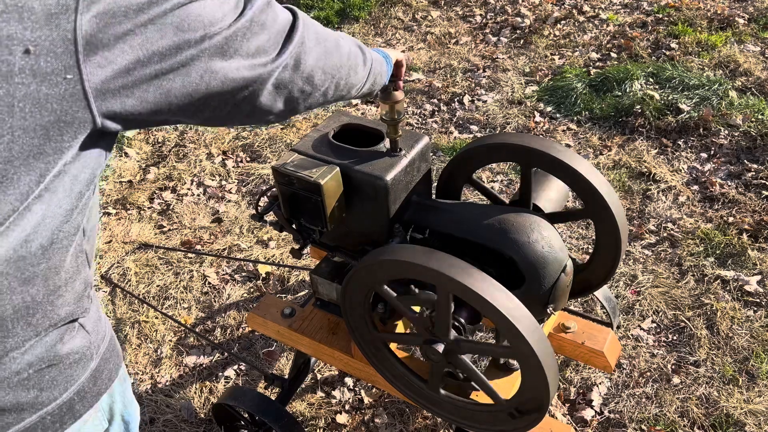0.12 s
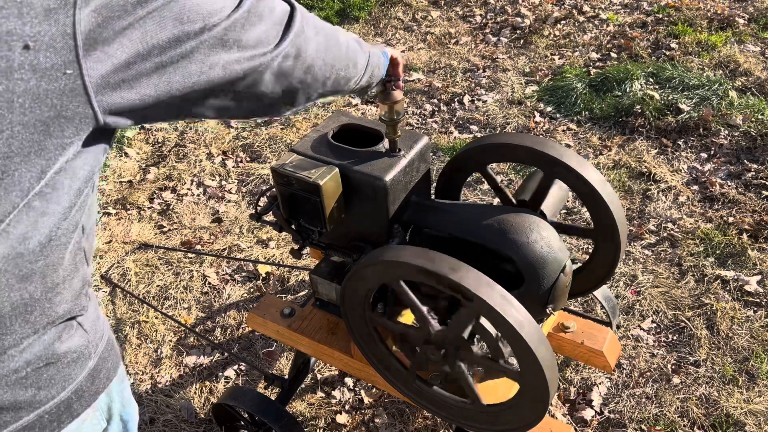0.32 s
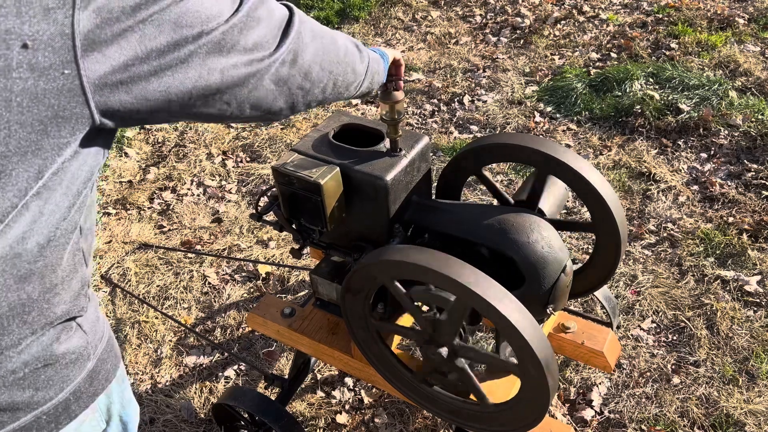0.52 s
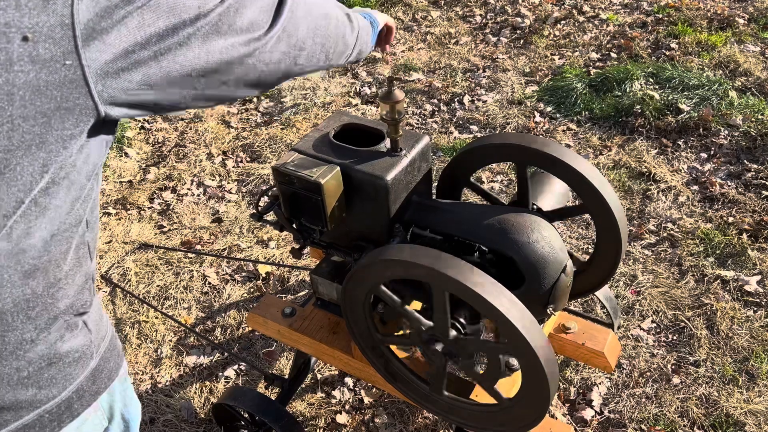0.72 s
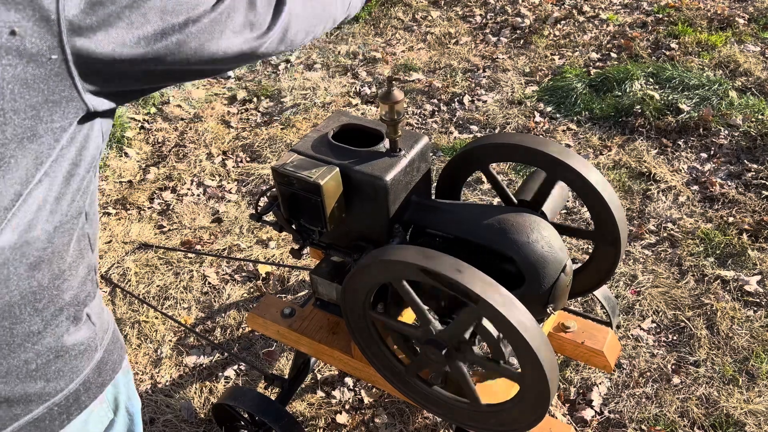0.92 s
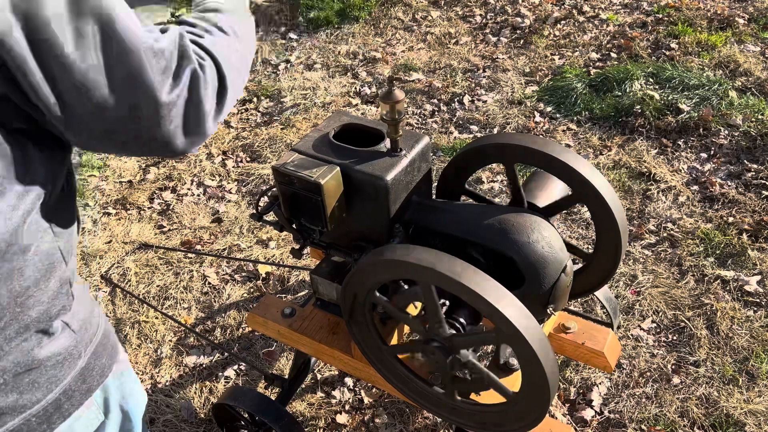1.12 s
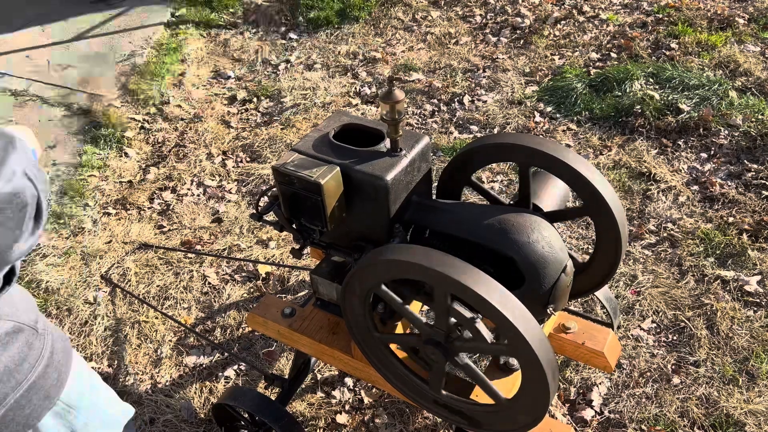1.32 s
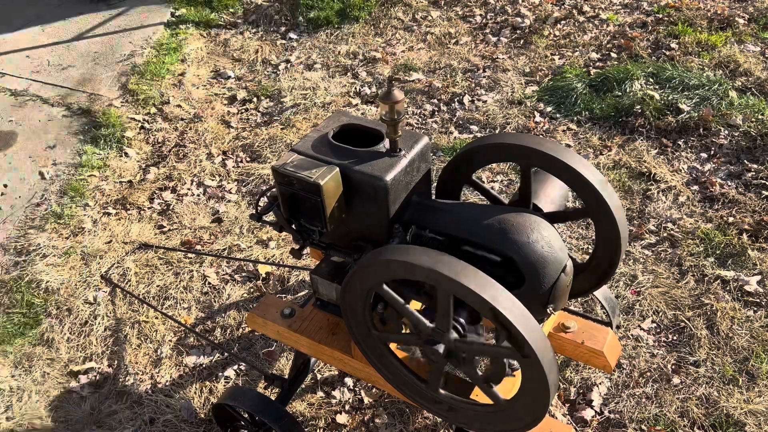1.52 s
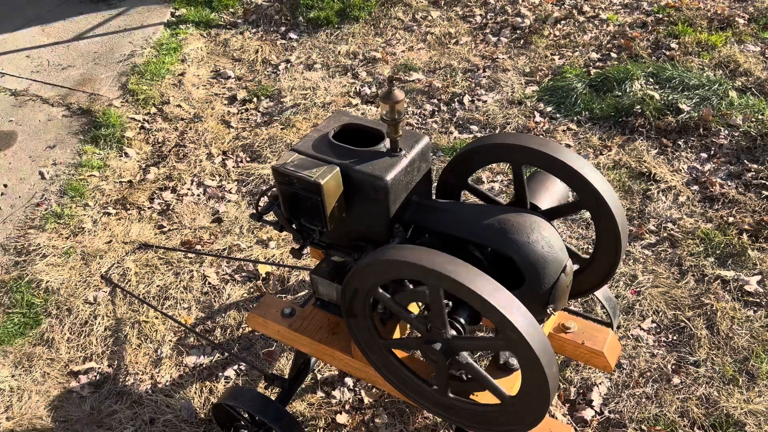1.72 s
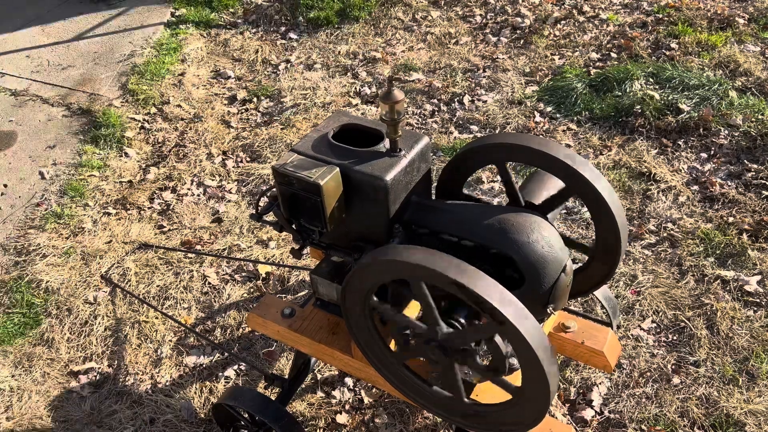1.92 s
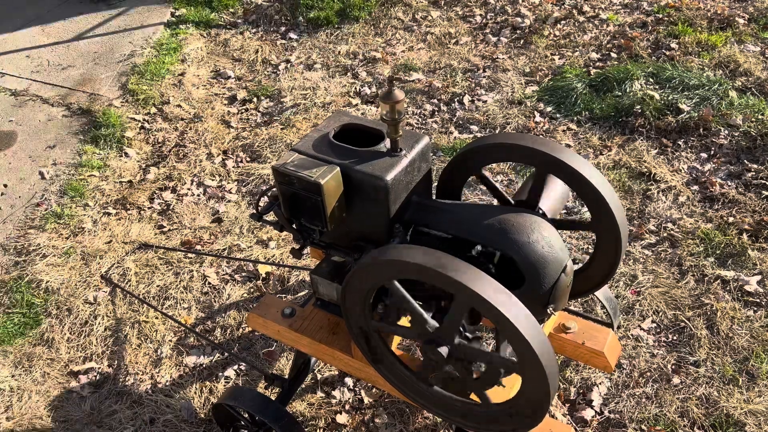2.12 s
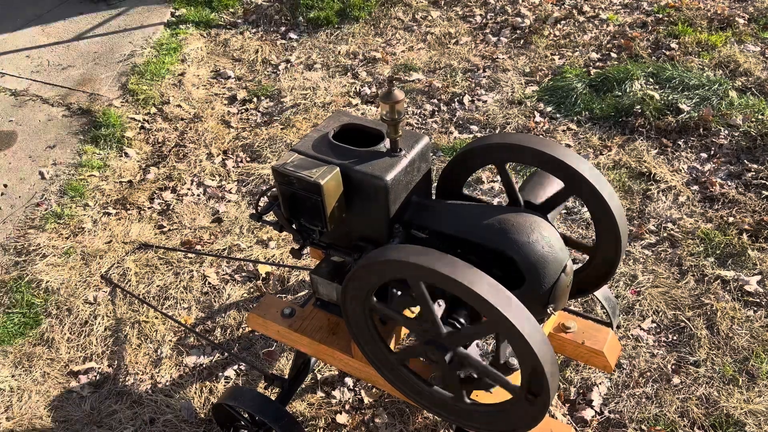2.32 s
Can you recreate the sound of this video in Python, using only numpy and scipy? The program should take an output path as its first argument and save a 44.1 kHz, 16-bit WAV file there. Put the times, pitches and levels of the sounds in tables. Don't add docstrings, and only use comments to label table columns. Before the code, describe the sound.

A small old single-cylinder engine close to the microphone in an open yard gives a brief rising huff, one loud sharp exhaust shot, then steady metallic ticks, clinks and breathy chuffs that slow and sink.

```python
import sys
import numpy as np
from scipy import signal
from scipy.fft import rfft, irfft
from scipy.io import wavfile
from scipy.ndimage import uniform_filter1d

SR = 44100
rng = np.random.default_rng(int(sys.argv[2]) if len(sys.argv) > 2 else 0)


def dump(signal):
    limited = np.clip(np.atleast_2d(signal).T, -1, 1)
    pcm = np.round(limited * 32767).astype(np.int16)
    wavfile.write(sys.argv[1], SR, pcm)


def volts_from_db(level):
    exponent = np.asarray(level, float) / 20
    return 10 ** exponent


N = 105840
LONG = 8192

# [start t/s, level/dB, hold/s, t60/s, brightness 0-1]
GAS_JETS = [(0.084, -50.5, .015, .1, 0.4), (.095, -40.5, 0.0094, .1, 0.85), (0.11, -37, 0.0044, .1, .7),
            (0.117, -22.5, 0.0047, .04, 0.96), (0.131, -30, 0.02, .06, 0.89), (0.169, -36, .004, .05, .9),
            (.179, -32.5, .025, .06, 0.92), (0.209, -21, 0.0055, 0.064, 0.94),
            (0.223, -12, 0.011, 0.026, 0.93), (0.235, -32.5, 0.0075, 0.11, 0),
            (0.266, -11, 0.014, .04, 0.98), (0.2682, -6.5, .01, .05, 1), (0.29, -29.5, 0.0088, .1, 0.93),
            (0.297, -36, 0.013, 0.12, 0), (0.315, -42.5, 0.0085, .06, 0.04)]
# [t/s, peak level/dB, f/Hz, t60/s]
PIPE_BLOWS = [(.229, -27.5, 2420, 0.018), (0.234, -18.5, 1827, 0.05), (0.2662, -9, 530, 0.013),
              (0.278, -22.5, 1030, 0.094), (0.2824, -11, 614, 0.054), (0.291, -15, 417, 0.037),
              (.293, -16.5, 516, .04), (0.311, -22, 398, 0.051), (.319, -23, 610, 0.032),
              (.327, -23.5, 326, 0.038), (2.278, -37.5, 1420, 0.041)]
# [t/s, peak level/dB, f/Hz]
MIC_PUSHES = [(.095, -43.5, 45), (0.123, -37, 106.3), (0.141, -43, 60), (0.144, -43.5, 170),
              (0.266, -32, 52.9), (0.281, -28.5, 129), (0.321, -39.5, 45.5), (.63, -55.5, 34),
              (2.14, -56, 30), (2.18, -62, 59.5), (2.35, -63, 35.2)]
# [t/s, f/Hz, level/dB]
HOWL = [
    (0.041, 248, -62),
    (0.064, 288.4, -44),
    (.09, 372, -40),
    (.11, 487, -38),
    (.13, 499, -40),
    (0.149, 432, -44.5),
    (.17, 300, -48),
    (.2, 260, -62.5),
]
# [start t/s, level/dB, pipe note f/Hz]
CHUFFS = [(0.411, -43.5, 302), (0.529, -45.5, 387), (0.645, -38, 334), (0.773, -49, 356), (0.884, -39, 708),
          (1.012, -50.5, 349), (1.123, -38.5, 305), (1.254, -48, 351), (1.372, -39, 358.6),
          (1.498, -41.5, 416), (1.624, -42.5, 405), (1.753, -46.5, 349), (1.879, -44.5, 388.7),
          (2.01, -47, 450), (2.141, -49, 396), (2.277, -51.5, 407)]
PITCH_SAG = 0.134
# [start t/s, level/dB, hold/s, loudest ring f/Hz]
SCUFFS = [(.009, -41, 0.045, 766), (0.496, -45.5, 0.058, 816), (0.734, -40.5, 0.061, 636),
          (0.969, -47, 0.055, 1125), (1.21, -39.5, 0.054, 754), (1.461, -40.5, 0.046, 1210),
          (1.847, -67, 0.056, 5930), (2.09, -64, 0.081, 3010), (1.71, -44, 0.018, 855),
          (1.965, -47.5, 0.053, 1260), (2.229, -46.5, 0.017, 3990)]
# [start t/s, level/dB, f/Hz, hold/s]
SQUEAKS = [(.012, -42, 1598, 0.055), (.012, -46.5, 759, 0.037), (.015, -59, 9700, 0.028),
           (.015, -52, 8680, 0.037), (.015, -50, 4760, 0.026), (.213, -37, 1190, 0.04),
           (0.216, -39, 1640, 0.05), (0.274, -31.5, 2290, 0.02), (.312, -40, 2233, 0.023),
           (0.129, -35.5, 4660, 0.013), (.42, -53, 6480, 0.024), (1.492, -49, 1210, 0.067),
           (.545, -47, 2810, 0.0059), (.535, -45, 878, 0.024), (.775, -45.5, 4850, 0.016),
           (.742, -43.5, 2320, 0.022), (.878, -45, 652, .035), (.995, -43, 1207, .03),
           (.98, -45.5, 840, 0.073), (.972, -48.5, 5600, 0.011), (1.016, -60, 2760, 0.04),
           (1.12, -53, 7350, 0.02), (1.125, -50, 12200, 0.015), (1.22, -50.5, 4780, 0.038),
           (1.22, -66, 9640, 0.026), (1.462, -43, 2795, 0.014), (1.49, -39.5, 4780, .025),
           (1.46, -44, 8740, 0.0095), (1.575, -50.5, 1970, 0.027), (1.575, -50, 8200, 0.013),
           (1.712, -38.5, 8160, 0.0064), (1.715, -49.5, 4870, 0.033), (1.752, -60, 3350, 0.041),
           (1.83, -48, 8200, 0.027), (1.835, -53.5, 5780, 0.023), (1.918, -62, 3310, 0.057),
           (1.968, -43, 5280, 0.0043), (1.975, -55, 8700, 0.014), (2.015, -57.5, 3370, 0.033),
           (2.09, -60, 3160, .035), (2.1, -59, 8220, 0.018), (2.24, -53, 8250, 0.013),
           (2.236, -47.5, 3900, 0.014)]
# [t/s, peak level/dB]
TICKS = [(0.3768, -30), (0.4926, -28.5), (0.607, -31.5), (0.7243, -30), (0.842, -31.5), (0.9618, -29),
         (1.0774, -36), (1.201, -43.5), (1.3237, -40), (1.4482, -30.5), (1.569, -30.5), (1.699, -26),
         (1.8263, -35), (1.9541, -35.5), (2.077, -36), (2.2174, -38.5), (2.3514, -46.5)]
# [t/s, peak level/dB, loudest ring f/Hz]
CLINKS = [(0.4253, -36, 10000), (0.6608, -33.5, 9880), (0.893, -33.5, 6170), (1.1342, -38, 9620),
          (1.3802, -38.5, 4500), (1.63, -39, 8510), (1.8862, -42, 6090), (2.154, -47.5, 6160)]
# [t/s, peak level/dB]
KNOCKS = [(0.544, -37), (0.777, -24.5), (1.016, -45), (1.258, -35), (1.505, -28), (1.7576, -33.5),
          (2.0137, -36), (2.278, -37.5)]
# [f/Hz, level/dB]
LATCH_MODES = [(8270, 9.5), (3900, 2), (9400, 10), (11000, -3), (12400, 10), (5960, 0)]
# [f/Hz, level/dB]
VALVE_MODES = [(9980, 6.5), (5900, -2), (8000, 3.5), (2797, -8.5), (12870, -25), (8560, -26)]
# [f/Hz, level/dB]
ROCKER_MODES = [(4780, -10), (2830, -0.5), (1210, 4.5), (1540, 5), (3350, -34)]
# [f/Hz, level/dB]
FRAME_MODES = [(720, 3), (880, -2), (1040, 0.5), (1210, -2.5), (1600, 1.5), (2300, -5.5), (2775, -7),
               (4835, -1), (8630, -11), (9580, -4)]
# [f/Hz, level/dB]
HUM_MODES = [(310, -11), (650, -11), (1205, -9.5), (1605, -16)]
CASTING_HZ = np.sort(rng.uniform(500, 15500, 60))
# [f/Hz, level per Hz/dB]
DULL = [(180, -42.5), (300, -33), (1840, -1), (4910, -12), (10400, -2.5), (16000, -20.5)]
# [f/Hz, level per Hz/dB]
BRIGHT = [(180, -46.5), (300, -50.5), (7080, -15.5), (13300, -2.5), (16000, -14)]
# [f/Hz, level per Hz/dB]
SCRAPE = [(300, 1), (900, 4.5), (2500, 4), (5500, -2.5), (8000, -16), (16000, -3.5)]
# [f/Hz, level per Hz/dB]
SNAP = [(880, -63), (1500, 5.5), (3090, -8), (4500, 0), (8490, -5), (16000, -7)]
# [f/Hz, level per Hz/dB]
YARD = [(18, -28.5), (40, -27.5), (145, -7), (311, 0), (684, 0.5), (1040, -4.5), (3580, -20), (8300, -13.5),
        (16000, -20.5)]
# [t/s, level/dB]
YARD_LEVEL = [(0, -39.5), (.08, -48.5), (0.129, -45.5), (.3, -39), (.42, -49), (1.602, -50.5), (2.4, -58)]
# [t/s, level/dB]
TREBLE = [(1.5, -6), (2.4, -20.5)]


def evened(x):
    return x / np.sqrt(np.mean(x ** 2) + 1e-20)


def smooth(x, width):
    return uniform_filter1d(uniform_filter1d(x, width), width)


def add(mix, s, sound):
    part = mix[round(s * SR):][:len(sound)]
    part += sound[:len(part)]


def colour(x, points):
    f, db = np.transpose(points)
    bins = np.fft.rfftfreq(len(x), 1 / SR)
    gain = volts_from_db(np.interp(np.log(bins + 1), np.log(f), db, left=-60))
    return irfft(rfft(x) * evened(gain), len(x))


def ring(x, hz, t60):
    r = 1000 ** (-1 / (t60 * SR))
    w = 2 * np.pi * hz / SR
    return np.sqrt((1 - r * r) / 2) * signal.lfilter([1, 0, -1], [1, -2 * r * np.cos(w), r * r], x)


def body(x, modes, t60, spread_db):
    total = 0
    for hz, db in modes:
        strength, detune, damping = rng.uniform(-1.45, 1, 3)
        tone = ring(x, hz * (1 + .008 * detune), t60 * volts_from_db(3 * damping))
        total = total + volts_from_db(db + spread_db * strength) * tone
    return total


def clatter(x, points, t60):
    modes = [(hz, 0) for hz in CASTING_HZ]
    ringing = body(x, modes, t60, 4.1) / np.sqrt(len(modes))
    return colour(ringing + volts_from_db(-11.5) * x, points)


def burst(rise, hold, t60, grain_db, grain_s):
    t = np.arange(LONG) / SR
    decay = volts_from_db(-60 * np.maximum(t - rise - hold, 0) / t60)
    shape = np.clip(t / rise, 0, 1) ** 2 * decay
    noise, lumps = rng.standard_normal((2, LONG))
    grain = evened(smooth(lumps, max(round(grain_s * SR), 1)))
    return shape * noise * volts_from_db(grain_db * grain)


def firing(mix):
    for s, db, hold, t60, bright in GAS_JETS:
        x = burst(0.0051, hold, t60, 2.4, 0.00048)
        muffled = colour(x, DULL) + clatter(x, DULL, 0.046)
        hissing = colour(x, BRIGHT)
        add(mix, s, volts_from_db(db) * (np.sqrt(1 - bright) * muffled + np.sqrt(bright) * hissing))
    t = np.arange(LONG) / SR
    for s, db, hz, t60 in PIPE_BLOWS:
        wobble = 1 + 0.29 * evened(uniform_filter1d(rng.standard_normal(LONG), 90))
        shape = volts_from_db(db - 60 * t / t60) * np.clip(t / 0.00085, 0, 1)
        add(mix, s, shape * wobble * np.sin(2 * np.pi * hz * t))
    for s, db, hz in MIC_PUSHES:
        swell = np.sin(np.pi * np.clip(t * hz / 2.17, 0, 1)) ** 2
        add(mix, s, volts_from_db(db) * swell * np.sin(2 * np.pi * hz * t))


def howl(mix):
    s, hz, db = np.transpose(HOWL)
    t = s[0] + np.arange(LONG) / SR
    rough = evened(smooth(rng.standard_normal(LONG), 120))
    level = volts_from_db(np.interp(t, s, db, right=-120) + 5.7 * rough)
    add(mix, s[0], level * np.sin(2 * np.pi * np.cumsum(np.interp(t, s, hz)) / SR))


def chuffs(mix):
    t = np.arange(LONG) / SR
    for s, db, hz in CHUFFS:
        x = burst(.018, .012, .13, 2, .004)
        shape = np.sqrt(abs(uniform_filter1d(x * x, 300)))
        sagging_hz = hz * (1 - PITCH_SAG * np.tanh(t / 0.046))
        note = shape * np.sin(2 * np.pi * np.cumsum(sagging_hz) / SR)
        pipe = volts_from_db(5.0) * ring(x, 289, 0.027) + volts_from_db(-6) * ring(x, 498.4, 0.049) + volts_from_db(-8) * ring(x, 645, 0.036)
        muffler = ring(pipe, 459, 0.014)
        low = ring(x, 168, 0.018) + volts_from_db(-6) * ring(x, 98, 0.13)
        add(mix, s - .008, volts_from_db(db - 4.5) * (volts_from_db(1.0) * note + volts_from_db(-14.5) * muffler + volts_from_db(-20) * low))


def scuffs(mix):
    for s, db, hold, hz in SCUFFS:
        x = burst(.012, hold - .005, .1, 2.5, .003)
        hiss = burst(.005, .008, .09, 3, .002)
        drag = volts_from_db(6.5) * clatter(hiss, SNAP, 0.029) + volts_from_db(-4.5) * clatter(x, SCRAPE, 0.0062)
        frame = body(x, FRAME_MODES, 0.06, 3.7)
        add(mix, s, volts_from_db(db - 9.0) * (drag + volts_from_db(-5.5) * frame + volts_from_db(3.5) * ring(x, hz, 0.027)))
    for s, db, hz, hold in SQUEAKS:
        rub = burst(0.004, hold, 0.034, 1.83, 0.00177)
        add(mix, s - .003, volts_from_db(db) * ring(rub, hz, 0.043))


def ticks(mix):
    for s, db in TICKS:
        x = burst(.007, .004, .02, 2, .0015)
        latch = body(x, LATCH_MODES, 0.035, 5)
        add(mix, s - .005, volts_from_db(db - 20) * (clatter(x, SNAP, 0.012) + volts_from_db(-9) * latch))


def clinks(mix):
    for s, db, hz in CLINKS:
        x = burst(.025, .015, .05, 3, .002)
        rattle = volts_from_db(-3) * clatter(x, BRIGHT, .035)
        valve = volts_from_db(-9) * body(x, VALVE_MODES, .04, 3)
        add(mix, s - .028, volts_from_db(db - 14) * (rattle + valve + ring(x, hz, .04)))


def knocks(mix):
    for s, db in KNOCKS:
        x = burst(0.0061, 0.0027, 0.042, 2.1, 0.0023)
        rocker = body(x, ROCKER_MODES, .07, 4)
        add(mix, s - .003, volts_from_db(db - 19.5) * (clatter(x, SCRAPE, 0.0072) + rocker))


def yard():
    z = signal.stft(rng.standard_normal(N + 512), nperseg=512)[2]
    patches = uniform_filter1d(rng.standard_normal(z.shape), 5, 0)
    patches = evened(uniform_filter1d(patches, 7, 1))
    x = evened(signal.istft(z * volts_from_db(4 * patches), nperseg=512)[1][:N])
    whirr = colour(x, YARD) + volts_from_db(-4.5) * body(x, HUM_MODES, .2, 0)
    level_db = np.interp(np.arange(N) / SR, *np.transpose(YARD_LEVEL))
    return volts_from_db(level_db - 2.0) * whirr


def reflections(mix):
    t = np.arange(LONG) / SR
    sparse = rng.standard_normal(LONG) * (rng.random(LONG) < .05)
    echoes = sparse * volts_from_db(-60 * t / 0.17) * (t > .003)
    return signal.oaconvolve(mix, echoes / np.linalg.norm(echoes))[:N]


def scene():
    mix = np.zeros(N)
    for source in (firing, howl, chuffs, scuffs, ticks, clinks, knocks):
        source(mix)
    return (mix + volts_from_db(-19.5) * reflections(mix) + yard())[None]


def low_pass(x):
    return signal.sosfilt(signal.butter(12, 16370, fs=SR, output="sos"), x)


def record(dry):
    t = np.arange(N) / SR
    high_pass = signal.butter(2, 7000, "high", fs=SR, output="sos")
    top = signal.sosfiltfilt(high_pass, dry)
    turned = dry + top * (volts_from_db(np.interp(t, *np.transpose(TREBLE))) - 1)
    faded = np.tanh(turned) * np.clip((t - .007) / .004, .15, 1)
    band_limit = signal.firwin(255, 15900, window=("kaiser", 9), fs=SR)[None]
    return low_pass(signal.oaconvolve(faded, band_limit, "same"))


dry = scene()
out = record(dry)
dump(out)
```